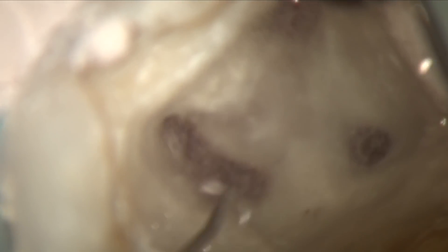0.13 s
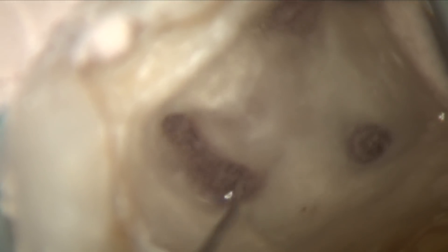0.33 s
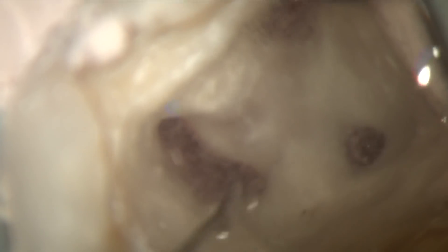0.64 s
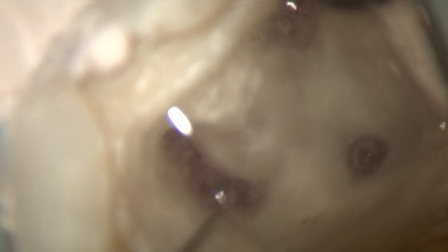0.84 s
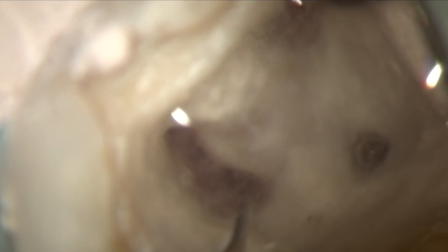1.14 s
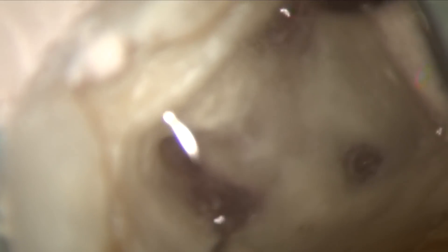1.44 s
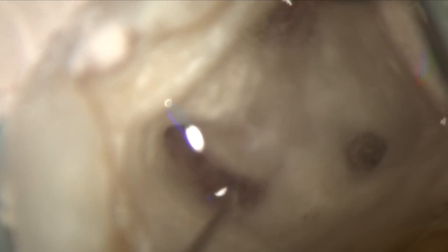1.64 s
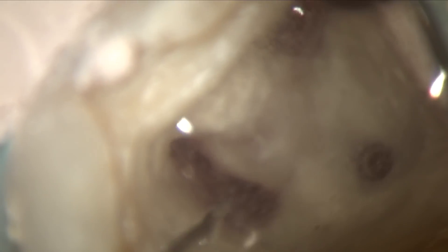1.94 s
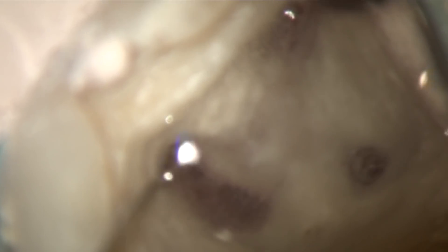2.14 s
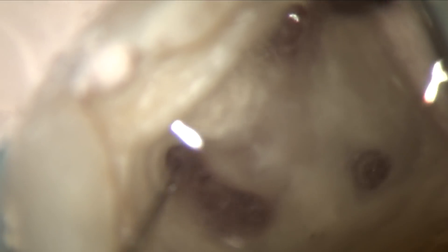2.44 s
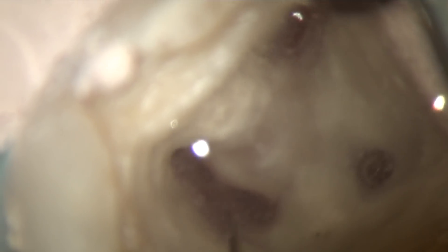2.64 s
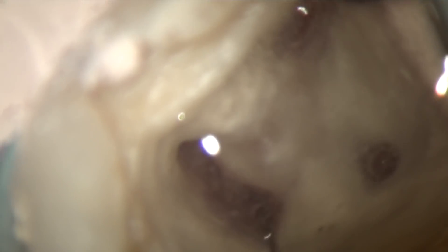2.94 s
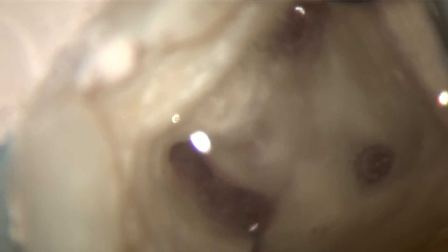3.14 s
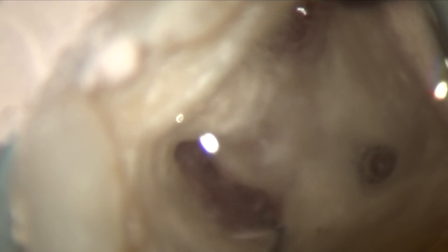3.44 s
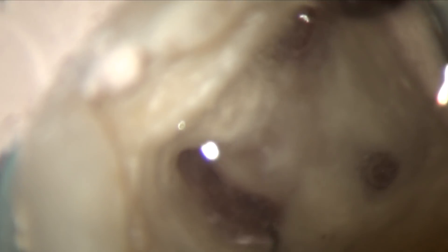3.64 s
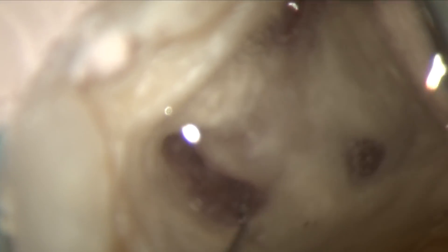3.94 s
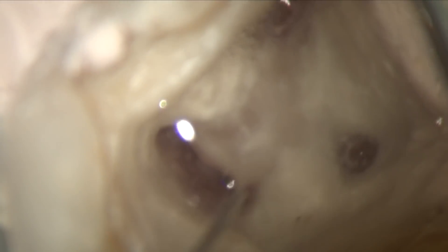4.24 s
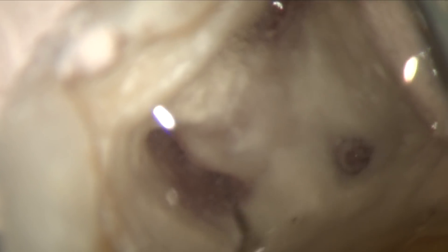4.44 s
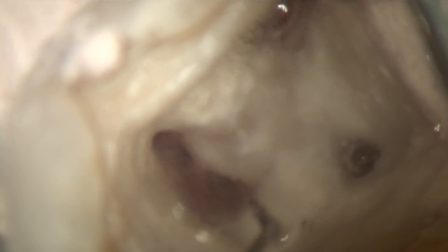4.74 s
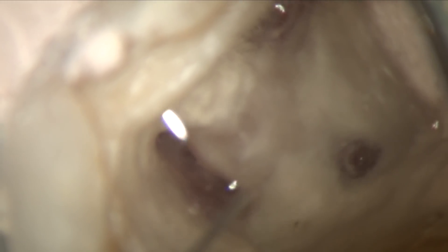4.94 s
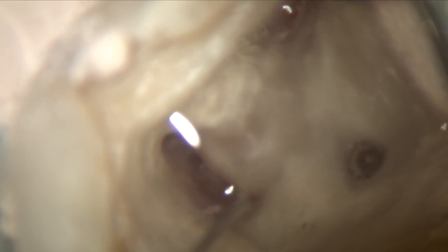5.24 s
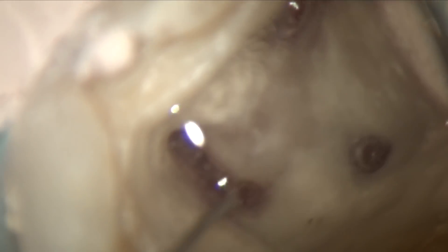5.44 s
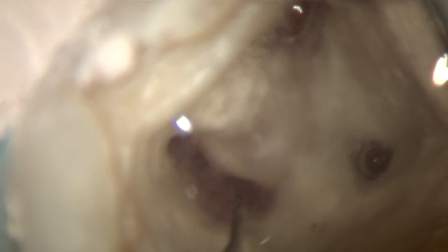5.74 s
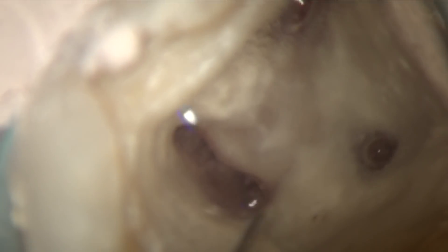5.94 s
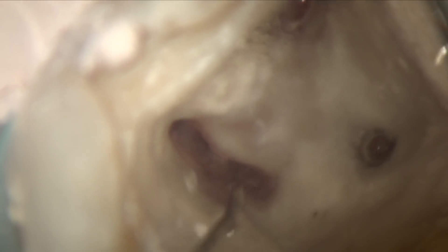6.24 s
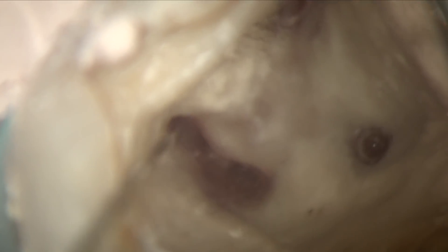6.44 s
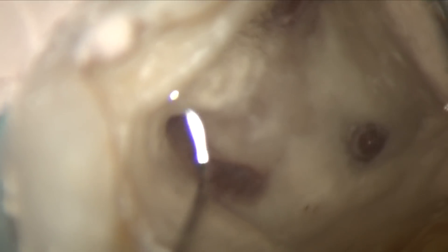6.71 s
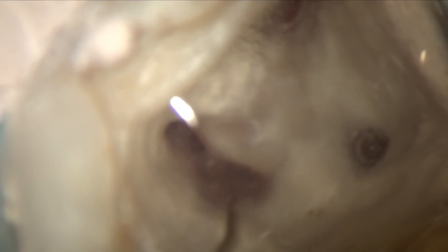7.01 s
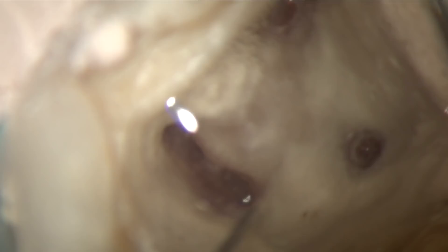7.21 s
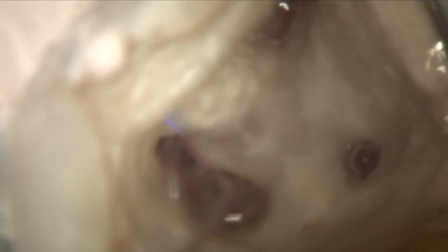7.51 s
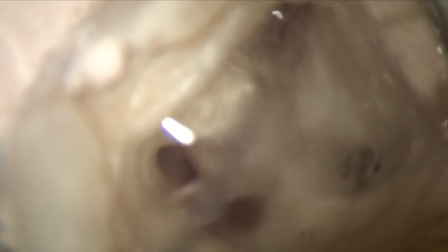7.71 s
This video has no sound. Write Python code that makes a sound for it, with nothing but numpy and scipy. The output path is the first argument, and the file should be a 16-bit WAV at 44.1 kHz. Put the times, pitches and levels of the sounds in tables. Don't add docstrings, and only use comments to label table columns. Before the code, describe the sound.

Steady turbulent suction hiss dominates, close and whistly, with a breathy motor drone underneath. Small dull tool bumps and rustles cluster early, with more scattered later. A quick chirp of a rubbing fitting is followed by a sharp loud click, with everything ducking around it. A faint low rubbing groan follows as the hiss gradually recovers. Close stereo pickup with automatic level control, small indoor room.

```python
import sys
import numpy as np
from scipy import signal
from scipy.fft import rfft, irfft, next_fast_len
from scipy.io import wavfile

SR = 44100
rng = np.random.default_rng(int(sys.argv[2]) if len(sys.argv) > 2 else 0)


def put_to_file(sound):
    columns = np.atleast_2d(sound).T
    safe = np.clip(columns, -1, 1)
    whole_steps = np.round(safe * 32767)
    wavfile.write(sys.argv[1], SR, whole_steps.astype(np.int16))


def field_ratio(decibels):
    return 10 ** (np.asarray(decibels, dtype=float) / 20)


N = 347067
FLOW_MEAN_DB = -15.5


def rms_one(x):
    return x / np.sqrt(np.mean(x ** 2) + 1e-20)


def at_hz(points, hz):
    point_hz, level_db = np.array(points).T
    return np.interp(np.log(np.maximum(hz, 1)), np.log(point_hz), level_db)


def drift(rate_hz):
    step, run_in = 40, 2000
    pole = np.exp(-2 * step * np.pi * rate_hz / SR)
    noise = rng.standard_normal(N // step + run_in + 2)
    slow = signal.lfilter([1], [1, -2 * pole, pole * pole], noise)[run_in:]
    return np.interp(np.arange(N) / step, np.arange(len(slow)), rms_one(slow))


def resonance(x, hz, width_hz):
    r = np.exp(-np.pi * width_hz / SR)
    feedback = [1, -2 * r * np.cos(2 * np.pi * hz / SR), r * r]
    stage = [(1 - r * r) / 2, 0, (r * r - 1) / 2] + feedback
    return signal.sosfilt([stage, stage], x)


def colour(x, points, share=1):
    size = next_fast_len(N)
    gain = field_ratio(share * at_hz(points, np.fft.rfftfreq(size, 1 / SR)))
    return irfft(rfft(x, size) * gain, size)[..., :N]


def swell(length_s, rise):
    t = np.arange(int(length_s * SR)) / SR
    return t, np.sin(np.pi * (t / length_s) ** rise)


def pump_room(apart_db):
    # hz [Hz], level_db [dB per Hz]
    rumble_spectrum = [(15, -60), (25, -26), (81, -27), (123, -14.5), (189, -16.5), (233, -11), (282, -14),
                       (315, -14.5), (367, -14), (963, -17.5), (1080, -20.5), (1380, -17), (2050, -17.5),
                       (2300, -5), (2990, -21.5), (5060, -120)]
    # hz [Hz], width_hz [Hz], level_db [dB below the hiss]
    motor_lines = [(315.4, 10.5, -32), (298, 9.7, -41), (346, 5.9, -43), (631, 10, -39), (992, 10, -38.5),
                   (1377, 23, -36), (1410, 24, -34.5), (170, 20, -39.5), (418.6, 28, -38),
                   (1788.5, 7, -36.5), (1987, 16, -35), (1653, 90, -31)]
    rumble_db, stir_db = -17, -55
    opposite = [[1], [-1]]

    mid, side = colour(rng.standard_normal((2, N)), rumble_spectrum)
    diffuse = rms_one(mid + field_ratio(apart_db) * side * opposite)
    out = field_ratio(rumble_db + 1.7 * drift(4.5)) * diffuse
    out += field_ratio(stir_db) * rms_one(resonance(rng.standard_normal(N), 45, 60)) * opposite

    noise = rng.standard_normal(N)
    turned_s = np.arange(N) / SR + np.cumsum(0.001195 * drift(1.194)) / SR
    for hz, width_hz, level_db in motor_lines:
        breathy = rms_one(resonance(noise, hz, width_hz))
        steady = (width_hz < 20) * 2.5 * np.sin(2 * np.pi * hz * turned_s)
        out = out + field_ratio(level_db) * rms_one(steady + breathy)
    return out


def tray(grain_db, broad_db):
    # start_s [s], length_s [s], centre_hz [Hz], width_hz [Hz], level_db [dB below the hiss]
    knocks = [(1.203, 0.08, 680, 180, -17), (1.238, .075, 550, 120, -16.5), (1.897, .11, 139, 47, -20),
              (1.904, .17, 307, 37, -18), (2.09, .075, 500, 100, -19), (2.1, .06, 600, 80, -20),
              (2.115, .05, 710, 80, -21), (5.11, .022, 1750, 150, -22), (2.12, .2, 170, 25, -25),
              (2.2, .3, 1400, 60, -31), (2.1, .12, 310, 40, -24), (5.39, .06, 820, 300, -28),
              (5.426, 0.05, 230, 75, -22), (5.88, 0.028, 747, 80, -15), (6.523, .035, 280, 140, -20),
              (7.192, 0.054, 300, 100, -24), (7.24, .06, 1390, 80, -30)]
    # start_s [s], length_s [s], centre_hz [Hz], level_db [dB below the hiss]
    rustles = [(.17, 0.095, 900, -24), (.602, 0.072, 950, -23), (.9, 0.069, 600, -24),
               (1.19, .14, 1650, -18), (1.612, .04, 650, -26), (1.9, .1, 480, -18.5),
               (3.772, 0.054, 520, -19.5), (3.82, 0.098, 794, -20), (3.827, 0.093, 446, -19.5),
               (4.85, .05, 500, -23), (6.24, .09, 700, -24), (6.4, .05, 800, -23), (7.197, .04, 700, -23)]
    relative_width = 0.82
    run_in = 2000

    slides = [(start_s, length_s, hz, relative_width * hz, level_db)
              for start_s, length_s, hz, level_db in rustles]
    out = np.zeros(N)
    noise = rng.standard_normal(N) * field_ratio(grain_db * drift(90))
    broad = rms_one(resonance(noise[::-1], 740, 1250))
    for start_s, length_s, hz, width_hz, level_db in knocks + slides:
        t, envelope = swell(length_s, rise=0.59)
        at = int(start_s * SR)
        end = at + len(t)
        body = rms_one(resonance(noise[at - run_in:end], hz, width_hz)[run_in:])
        out[at:end] += field_ratio(level_db) * envelope * (body + field_ratio(broad_db) * broad[at:end])
    return out


def squeaks():
    # start_s [s], length_s [s], start_hz [Hz], end_hz [Hz], level_db [dB below the hiss]
    rubs = [
        (5.109, .025, 910, 850, -9.5),
        (5.133, .018, 860, 815, -13),
        (6.815, .19, 213, 209, -20.5),
        (7.0, .07, 205, 192, -28),
        (4.98, .09, 215, 215, -29),
    ]
    # hz [Hz], level_db [dB]
    overtone = [(200, -23), (850, -14), (910, -3)]
    out = np.zeros(N)
    rough = field_ratio(1.5 * drift(70))
    for start_s, length_s, start_hz, end_hz, level_db in rubs:
        t, envelope = swell(length_s, rise=0.55)
        glide = (end_hz - start_hz) * t * t / (2 * length_s)
        phase = 2 * np.pi * (start_hz * t + glide)
        tone = np.sin(phase) + field_ratio(at_hz(overtone, start_hz)) * np.sin(2 * phase)
        at = int(start_s * SR)
        out[at:at + len(t)] += field_ratio(level_db) * envelope * tone
    return out * rough


def tap():
    # start_s [s], hz [Hz], t60_s [s], peak [full scale]
    start_s, hz, t60_s, peak = (5.88547, 4200, .0017, 2.9)
    t = np.maximum(np.arange(N) / SR - start_s, 0)
    rise = 1 - np.exp(-t / .00025)
    return peak * rise * field_ratio(-60 * t / t60_s) * np.sin(2 * np.pi * hz * t)


def suction(low_db, top_db, flutter_db, own_db):
    # hz [Hz], width_hz [Hz], level_db [dB]
    modes = [(2314, 280, -12.5), (2497, 300, -4.5), (2773, 320, -3.5), (3170, 390, -16.5),
             (3782, 286, -4.5), (4072, 345, -6), (4802, 360, -1), (5073, 450, -3.5), (5444, 590, -10),
             (6270, 970, -9.5), (6700, 400, -15), (7687, 730, -10.5), (8950, 1330, -16.5),
             (10400, 900, -15), (11300, 950, -13), (11940, 690, -12), (13460, 700, -15.5),
             (14150, 500, -16.5), (15000, 600, -15.5), (15400, 500, -16)]
    # lag_s [s], level_db [dB]
    echoes = [(.0031, -19.5), (.0077, -22.5), (0.0125, -21), (0.019, -28)]
    jet = rng.standard_normal((3, N))
    flutter = 0.51 * drift(9.6) + 0.52 * drift(54)
    groups = np.zeros((3, N))
    for k, (hz, width_hz, level_db) in enumerate(modes):
        mode = resonance(jet[k % 3], hz, width_hz)
        waver_db = flutter_db * flutter + own_db * drift(3.3)
        groups[int(k > 2) + int(k > 11)] += field_ratio(level_db + waver_db) * mode
    for lag_s, level_db in echoes:
        lag = int(lag_s * SR)
        groups[:, lag:] += field_ratio(level_db) * groups[:, :-lag]
    low, middle, top = [rms_one(group) for group in groups]
    return field_ratio(low_db) * low + middle + field_ratio(top_db) * top


def flowing_hiss():
    # [dB, lowest modes relative to the hiss]
    flow = [(0.0, -15.5, -5.5), (0.65, -15.5, -4.5), (0.98, -15.5, -4), (1.12, -15.5, -6), (1.7, -14.5, -7),
            (2.0, -15.8, -6), (2.7, -14, -8), (3.0, -14.5, -6.5), (3.45, -15, -8), (3.63, -15.5, -4.5),
            (3.99, -15, -7.5), (4.55, -14, -5.5), (4.95, -15, -7.5), (5.45, -15, -5.5), (5.7, -15.5, -7.5),
            (6.1, -15.5, -7), (6.6, -15.5, -7.5), (7.2, -16, -7.5), (7.87, -16.5, -6.5)]
    top_mean_db, top_follows = -7, 0.69
    time_s, *columns = np.transpose(flow)
    flow_db, low_db = [np.interp(np.arange(N) / SR, time_s, column) for column in columns]
    top_db = top_mean_db - (1 - top_follows) * (flow_db - FLOW_MEAN_DB)
    return field_ratio(flow_db) * suction(low_db, top_db, flutter_db=.7, own_db=.7)


def gain_control():
    # start_s [s], depth_db [dB]
    ducks = [
        (0.0, 1.5),
        (1.03, 0.64),
        (1.86, 1),
        (3.06, 1.27),
        (4.86, 1),
        (5.63, 0.8),
        (5.852, 7),
    ]
    fall_s, hold_s, recover_s = 0.0044, .1, 2.1
    t = np.arange(N) / SR
    gain_db = np.zeros(N)
    for start_s, depth_db in ducks:
        fall = np.clip((t - start_s) / fall_s, 0, 1)
        recovery = np.exp(-np.maximum(t - start_s - hold_s, 0) / recover_s)
        gain_db -= depth_db * fall * recovery
    return gain_db


def balance(both):
    # [dB, left minus right]
    imbalance = [(60, -3), (210, 0.5), (320, 4), (450, 2), (800, 2), (1420, -0.5), (1560, -6), (1950, -5.5),
                 (2300, -4.6), (4500, -4), (4800, -3), (7400, -3.5), (8500, -5.5), (11300, -1)]
    return np.array([colour(both[0], imbalance, share=0.52), colour(both[1], imbalance, share=-0.53)])


def scene():
    pump_db, pump_fade_db_per_s = -15.5, 0.2942
    t = np.arange(N) / SR
    pump = field_ratio(pump_db - pump_fade_db_per_s * t) * pump_room(apart_db=-26)
    tools = field_ratio(FLOW_MEAN_DB) * (tray(grain_db=3.5, broad_db=-14) + squeaks())
    both = field_ratio(gain_control()) * (pump + tools + flowing_hiss()) + tap()
    return balance(both)


def top_cut(x):
    return signal.sosfilt(signal.butter(12, 16520, fs=SR, output="sos"), x)


def record(dry):
    cutoff_hz = 15730
    size = next_fast_len(N)
    rounded = 1.538 * np.tanh(dry / 1.465)
    kept = np.fft.rfftfreq(size, 1 / SR) < cutoff_hz
    mix = irfft(rfft(rounded, size) * kept, size)[:, :N]
    return top_cut(mix)


dry = scene()
out = record(dry)
put_to_file(out)
```